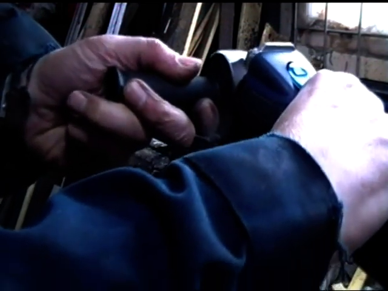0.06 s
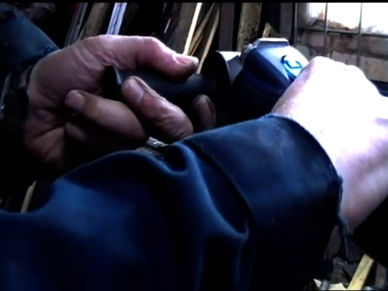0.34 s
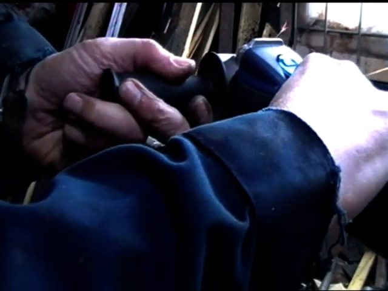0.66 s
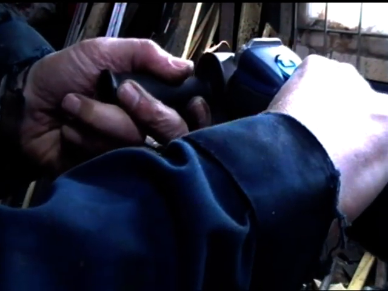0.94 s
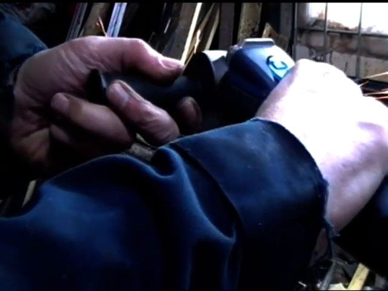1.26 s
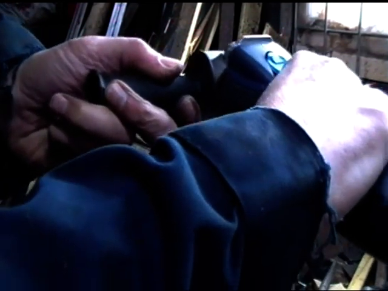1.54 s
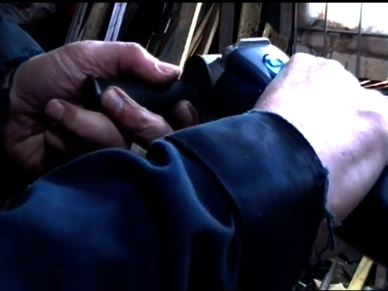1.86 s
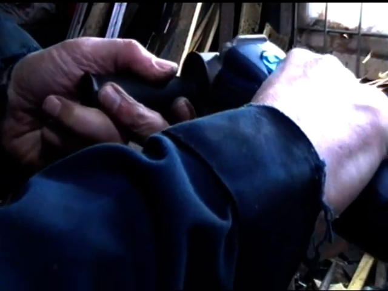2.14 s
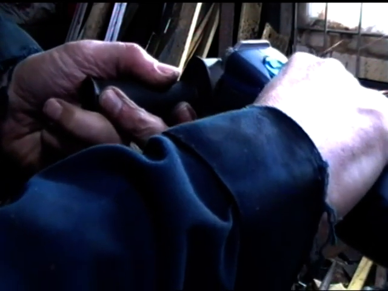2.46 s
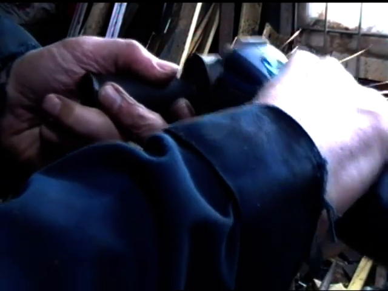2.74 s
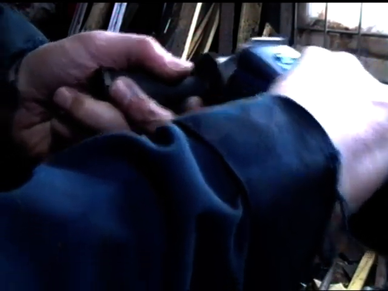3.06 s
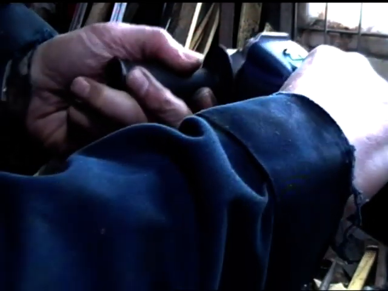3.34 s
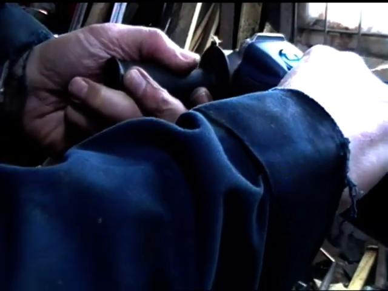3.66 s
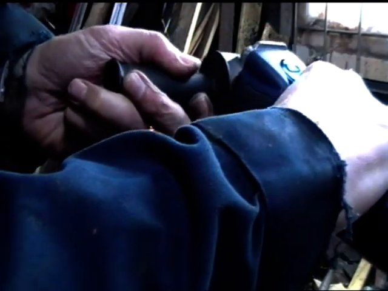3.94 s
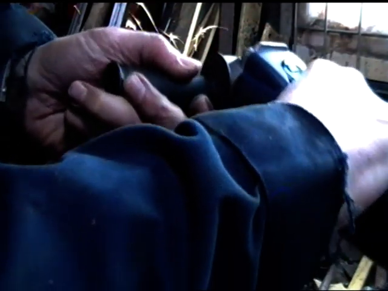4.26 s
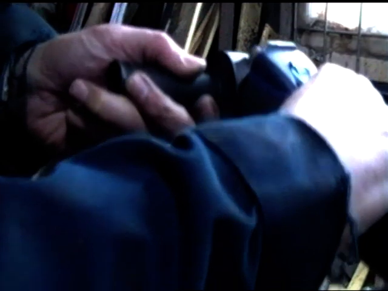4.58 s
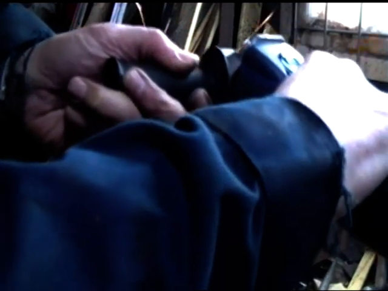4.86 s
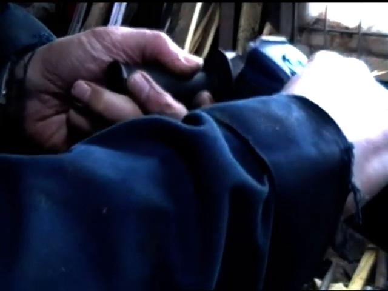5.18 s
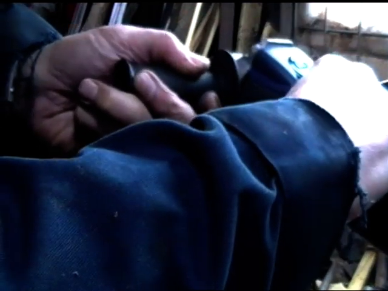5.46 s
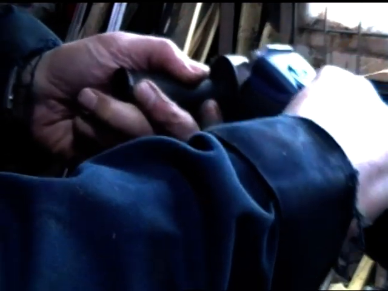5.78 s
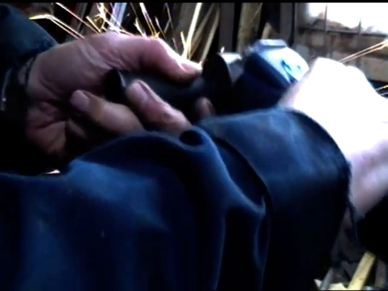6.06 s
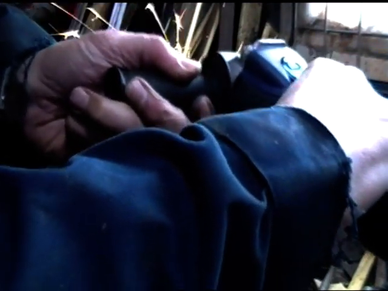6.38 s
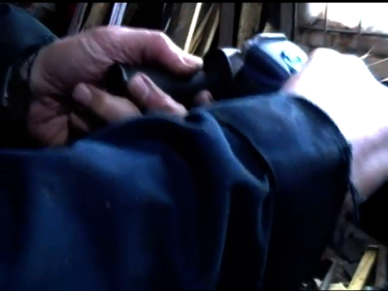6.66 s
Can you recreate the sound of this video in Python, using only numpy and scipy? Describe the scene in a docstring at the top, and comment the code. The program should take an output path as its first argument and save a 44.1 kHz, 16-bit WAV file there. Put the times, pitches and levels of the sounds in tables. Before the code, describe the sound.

Close, loud and harsh, an angle grinder's disc scrapes steel in a workshop. It grazes lightly at first, then bears down in a long cut, a shorter one and another long one. The whine dips slightly under each push and recovers as the pressure eases. Metallic ringing, shifting squeals and a few crisp ticks of grit ride on the hiss, and the tool is still running at the end.

```python
"""A close, harsh rasp over a motor's whine: an angle grinder cuts steel in a workshop.
The disc's grit scrapes the steel turn after turn; steel, guard and disc ring, and friction makes them sing.
Pressed in three times, the motor sags and picks up again. Its gears whine, its rotor hums
and its fan blows air through the vents."""
import sys
import numpy as np
from scipy import signal
from scipy.fft import rfft, irfft
from scipy.io import wavfile
from scipy.ndimage import map_coordinates

SR = 44100
rng = np.random.default_rng(int(sys.argv[2]) if len(sys.argv) > 2 else 0)


def file_out(sig):
    """Save sig as 16-bit WAV at sys.argv[1]."""
    # one column per channel
    cols = np.atleast_2d(sig).T
    # limit, then scale
    lim = np.clip(cols, -1, 1)
    pcm = np.round(lim * 32767).astype(np.int16)
    wavfile.write(sys.argv[1], SR, pcm)


N = 305172
T = np.arange(N) / SR
FREQS = np.fft.rfftfreq(N, 1 / SR)
PINION_TEETH, CROWN_TEETH = 12, 37


def grit(disc_turns, repeat_share, wear_turns, points=512):
    """The rim's grain pattern recurs every turn and wears away; breaking grains add fresh noise."""
    count = int(disc_turns.max()) + 3
    fresh = rng.standard_normal((2 * count, points))
    rim = signal.lfilter([1], [1, -np.exp(-1 / wear_turns)], fresh, axis=0)[count:]  # one row a turn
    rim = signal.resample_poly(rim.ravel(), 1, 2)
    passing = map_coordinates(rim, [(disc_turns + 1) * points / 2], order=3)
    return np.sqrt(repeat_share) * unit(passing) + np.sqrt(1 - repeat_share) * rng.standard_normal(N)


# Scrape spectrum: (frequency [Hz], relative level [dB])
SCRAPE_SPECTRUM = [(100, -29.5), (1000, -13.5), (2500, 7.5), (5000, -3.5), (5900, 4), (7000, 0),
                   (8200, -0.5), (9600, -8.5), (10800, -8), (11500, -10.5), (12200, -38)]
# Scrape stereo image: (frequency [Hz], left-right correlation [-1..1])
SCRAPE_CORRELATION = [(1000, 1), (3000, 0.71), (5000, 0.86), (5900, 0.3), (7000, 0.24), (8100, -0.4),
                      (8900, 0.46), (10600, -0.21), (12000, -0.077)]

def scrape(disc_turns, contact, load, skip_db):
    """Grains cut the steel: a bright hiss that buzzes at the disc's rate."""
    bite_db = -29 + .5 * contact + 2.1 * load - skip_db + .5 * wander(10)
    grains = [grit(disc_turns, repeat_share=.75, wear_turns=1.7) for _ in range(2)]
    return amp(bite_db) * stereo(grains, amp(per_bin(SCRAPE_SPECTRUM)), per_bin(SCRAPE_CORRELATION))


def sizzle(disc_turns, contact, load, skip_db):
    """The finest hiss of the cut, heard only while the grit bites."""
    level_db = -44.5 + 2.5 * load - 5.1 * skip_db
    grains = [grit(disc_turns, repeat_share=.75, wear_turns=3) for _ in range(2)]
    return contact * amp(level_db) * stereo(grains, band(10600, 540), correlation=.1)


def chips(per_s):
    """Coarse grains break off: sparse clicks of uneven size."""
    return unit(rng.standard_normal(N) * (rng.random(N) < per_s / SR))


# Steel and guard modes: (frequency [Hz], nominal width [Hz], relative level [dB])
STEEL_MODES = [(1053, 60, -12), (1474, 80, -10), (1868, 67, -6), (2268, 55, -5.5), (2525, 140, -3.5),
               (3040, 220, -7), (4172, 70, -7.5)]

def steel_ring(disc_turns, load, skip_db):
    """Grit and chips drive the resonances of steel and guard."""
    grains = [grit(disc_turns, repeat_share=.034, wear_turns=6.4) + .14 * chips(per_s=150)
              for _ in range(2)]
    power = sum((amp(db) * band(hz, .59 * width_hz)) ** 2 for hz, width_hz, db in STEEL_MODES)
    level_db = -31 + .7 * load - .32 * skip_db
    return amp(level_db) * stereo(grains, np.sqrt(power), correlation=.9)


# Disc modes: (multiple of main pitch, width [Hz], relative level [dB], change at load 1 [dB])
DISC_RESONANCES = [(.968, 250, -5, 0), (1.004, 200, -4.5, 0), (1, 50, -7.5, 0), (1.068, 200, -2.3, -2)]
# Main pitch of the disc: (time [s], frequency [Hz])
DISC_PITCH_HZ = [(0, 3360), (.9, 3418), (1.5, 3390), (2.0, 3377), (2.75, 3350), (3.15, 3334), (3.6, 3400),
                 (4.1, 3436), (4.9, 3420), (5.6, 3410), (6.3, 3420), (6.92, 3390)]

def disc_ring(load, skip_db):
    """The disc's resonances drift as the point of contact moves."""
    pitch_hz = per_sample(DISC_PITCH_HZ) + 14 * wander(5.1)
    modes = sum(amp(db + load_db * load) * resonate(stereo_noise(), multiple * pitch_hz, width_hz)
                for multiple, width_hz, db, load_db in DISC_RESONANCES)
    return amp(-27 - .15 * skip_db) * stereo(modes, 1, correlation=.87)


# Face rub: (time [s], level [dB])
RUB_DB = [(0, -46), (.35, -37.5), (.55, -43), (.75, -41), (.95, -40), (1.3, -35.5), (1.5, -39),
          (2.3, -36.5), (2.48, -42), (2.8, -38), (3.1, -45), (3.4, -34.5), (3.8, -39.5), (4.05, -46),
          (4.75, -35), (5.5, -47), (5.75, -45), (6.92, -41.5)]
# Edge grazes: (time [s], half-width [s], level [dB])
EDGE_GRAZES = [(.01, .05, -27.5), (.17, .06, -28), (.71, .06, -29), (1.15, .05, -31), (1.31, 0.087, -28.5),
               (1.5, .04, -26.5), (1.75, 0.077, -33), (2.09, .09, -30), (2.33, 0.037, -28),
               (2.75, 0.21, -32), (3.3, 0.037, -31), (3.5, 0.07, -32), (3.88, 0.065, -33), (4.3, 0.1, -37),
               (4.66, 0.054, -29), (6.08, 0.15, -32), (6.5, 0.11, -32)]

def rubbing():
    """The disc's face rubs low on the steel; its edge grazes with a brighter rasp."""
    face = amp(per_sample(RUB_DB)) * stereo(stereo_noise(), band(1500, 350), correlation=.99)
    edge = swells(EDGE_GRAZES) * stereo(stereo_noise(), band(4500, 1060), correlation=1)
    return face + edge


def friction_tone(start_s, end_s, cycles, ramp_s=.06, flutter_db=2.3, waver_rad=.65):
    """Friction builds up a narrow tone, holds it with a slight waver and lets go."""
    envelope = np.clip(np.minimum(T - start_s, end_s - T) / ramp_s, 0, 1)
    flutter = amp(flutter_db * wander(40))
    return envelope * flutter * np.cos(2 * np.pi * cycles + waver_rad * wander(24))


# Steel tones: (start [s], end [s], multiple of disc rate, level [dB])
STEEL_TONES = [(.5, .8, 13, -39), (1.2, 1.48, 14, -37), (1.28, 1.7, 13, -34.5), (1.7, 1.88, 13, -30),
               (1.86, 2.03, 13, -26), (2.06, 2.22, 13, -32.5), (1.9, 2.15, 16, -36), (2.08, 2.42, 45, -46),
               (2.1, 2.9, 10, -42), (2.12, 2.6, 16, -34), (2.15, 2.45, 56, -48), (2.2, 2.98, 33, -44),
               (2.27, 2.47, 13, -28), (2.42, 2.78, 55, -49), (2.47, 3.0, 13, -33.5), (2.58, 2.93, 16, -30),
               (2.95, 3.11, 16, -31.5), (3.55, 3.88, 13, -35), (3.68, 3.97, 16, -36.5),
               (3.85, 4.11, 13, -32), (4.15, 4.35, 12, -32.5), (4.25, 4.48, 16, -35), (4.25, 4.4, 15, -36),
               (4.66, 5.38, 13, -35.5), (5.08, 5.34, 16, -33), (5.25, 5.75, 25, -37.5),
               (5.36, 5.6, 13, -31), (5.38, 5.72, 17, -32), (5.4, 5.9, 44, -52), (5.5, 5.8, 33, -38),
               (5.7, 6.8, 12, -40), (5.72, 6.38, 14, -37.5), (5.85, 6.12, 33, -35), (5.87, 6.08, 17, -32),
               (5.9, 6.2, 15, -36.5), (6.1, 6.5, 54, -51), (6.12, 6.4, 33, -37.5), (6.15, 6.8, 17, -37.5),
               (6.35, 6.82, 14, -36.5), (6.4, 6.85, 13, -35), (6.42, 6.85, 58, -54), (6.44, 6.86, 33, -36)]
# Disc squeals: (start [s], end [s], frequency [Hz], level [dB])
DISC_SQUEALS = [(.76, 1.15, 3452, -35.5), (1.82, 1.99, 3400, -31), (2.62, 2.85, 3310, -35),
                (3.3, 3.56, 3390, -35), (3.52, 3.95, 3405, -35.5), (3.97, 4.18, 3450, -29.5),
                (4.78, 4.97, 3470, -28.5), (4.93, 5.15, 3440, -32.5), (5.3, 5.6, 3410, -35),
                (6.72, 7.05, 3455, -30), (6.8, 7.05, 3400, -27)]

def singing(disc_turns, skip_db):
    """The steel sings locked to the disc's rate, choked by skips; the disc squeals at its own pitches."""
    steel = sum(amp(db) * friction_tone(start_s, end_s, round(multiple) * disc_turns)
                for start_s, end_s, multiple, db in STEEL_TONES)
    disc = sum(amp(db) * friction_tone(start_s, end_s, hz * T) for start_s, end_s, hz, db in DISC_SQUEALS)
    return steel * amp(-.5 * skip_db) + disc


# Grain snaps: (time [s], level [dB])
GRAIN_SNAPS = [(.907, -23), (1.057, -21.5), (1.33, -22), (1.479, -22), (1.893, -19.5), (4.064, -22),
               (4.371, -23), (4.428, -22), (4.851, -17.5), (4.86, -21), (4.983, -22), (5.072, -22),
               (5.158, -21.5), (6.128, -22), (6.178, -19), (6.732, -20.5)]

def snaps(decay_s=.002):
    """The coarsest grains crack off with a short, bright tick."""
    envelope = sum(amp(db) * (T >= at_s) * np.exp(-abs(T - at_s) / decay_s) for at_s, db in GRAIN_SNAPS)
    return envelope * stereo(stereo_noise(), band(3200, 970), correlation=.98)


# Presses: (start [s], end [s], start load, midway load, end load); load 1 = a firm push
PRESS_LOADS = [(0.71, 3.06, 0.04, 0.81, 1.08), (3.51, 4.48, 0.39, 0.9, 1.19),
               (4.87, 6.81, 0.72, 1.06, 0.93)]

def pressing(ramp_s=.08):
    """Contact and load on the disc: each press sets in quickly, bears down and lets go."""
    contact, load = np.zeros((2, N))
    for start_s, end_s, *push in PRESS_LOADS:
        touch = np.clip(np.minimum(T - start_s, end_s - T) / ramp_s + .5, 0, 1)
        contact += touch
        load += touch * np.interp(T, [start_s, (start_s + end_s) / 2, end_s], push)
    return contact, load


# Disc skips: (time [s], half-width [s], loss of bite [dB])
DISC_SKIPS = [(0.603, 0.069, 2), (2.94, 0.022, 3), (3.153, 0.052, 9), (4.23, 0.07, 2.5), (5.22, 0.066, 0.5),
              (5.818, 0.042, 2), (6.125, 0.03, 1), (6.4, 0.095, 2), (6.89, 0.11, 3)]

def skipping():
    """Bite lost, in dB, as the disc skips on the work too briefly to change speed."""
    return sum(db * bell(at_s, half_width_s) for at_s, half_width_s, db in DISC_SKIPS)


# Roar spectrum: (frequency [Hz], relative level [dB])
ROAR_SPECTRUM = [(20, -39), (80, -22.5), (150, -22.5), (220, -16.5), (350, -18.5), (520, -8.5), (750, -7.5),
                 (1350, -1.1), (2800, 0.5), (4500, 2.5), (7000, -6), (7700, -16.5), (9500, -13.5),
                 (11000, -19.5), (13000, -37)]
# Roar stereo image: (frequency [Hz], left-right correlation [-1..1])
ROAR_CORRELATION = [(30, 0.8), (200, 0.99), (500, 0.89), (1200, 0.91), (3500, 1), (5500, 0.48),
                    (7000, 0.55), (11000, 0.25)]

def roar(contact, load, sag, response_s=.14):
    """Vent air and disc rub: a broad roar that swells as the released motor picks up."""
    surge = lag(sag * (1 - contact), response_s)
    level_db = -24.5 - 1.48 * lag(load, response_s) + 2 * surge + .5 * wander(13)
    return amp(level_db) * stereo(stereo_noise(), amp(per_bin(ROAR_SPECTRUM)), per_bin(ROAR_CORRELATION))


# Rotor hum: (time [s], level [dB])
HUM_DB = [(0, -45), (1.2, -48.5), (1.65, -43), (2.25, -48.5), (2.8, -42.5), (3.15, -50.5), (3.45, -41.5),
          (4.1, -46.5), (4.45, -42.3), (4.68, -45.5), (4.9, -41), (5.3, -49), (5.95, -41), (6.92, -44.5)]
# Gear whine: (time [s], level [dB])
WHINE_DB = [(0, -52), (.55, -48), (.9, -54), (1.2, -45.5), (2.3, -40), (2.7, -42), (3.2, -41), (3.8, -44),
            (4.12, -40), (4.4, -42.5), (4.65, -38), (5.05, -44), (5.35, -40), (5.9, -42), (6.92, -41.5)]

def motor(rotor_turns, mains_hz=50):
    """Rotor unbalance, gear mesh, disc wobble and mains hum."""
    rotor_rad = 2 * np.pi * rotor_turns
    unbalance = amp(per_sample(HUM_DB) + .5 * wander(10)) * np.sin(rotor_rad)
    backlash_rad = .6 * wander(14) + .3 * wander(110)  # the teeth meet unevenly
    mesh = amp(per_sample(WHINE_DB) + 2 * wander(25)) * np.sin(PINION_TEETH * rotor_rad + backlash_rad)
    wobble = amp(-64 + 2 * wander(8)) * np.sin(rotor_rad * PINION_TEETH / CROWN_TEETH)
    mains = amp(-64.5 + 1.4 * wander(12)) * np.sin(2 * np.pi * mains_hz * T)
    return np.sqrt(2) * (unbalance + mesh + wobble + mains)


# Housing thrums: (time [s], half-width [s], level [dB])
HOUSING_THRUMS = [(.17, 0.092, -60), (1.1, 0.092, -50), (3.45, 0.11, -59), (4.68, 0.054, -49)]

def thrum():
    """The housing thrums in the hands: brief, dull swells."""
    rumble = irfft(rfft(rng.standard_normal(N)) * band(204, 30), N)
    return swells(HOUSING_THRUMS) * unit(rumble)


def amp(db):
    """Decibels to gain."""
    return 10 ** (np.asarray(db) / 20)


def unit(x):
    """Scales to rms 1."""
    return x / np.sqrt(np.mean(np.abs(x) ** 2) + 1e-20)


def per_sample(table):
    """Interpolates a time table."""
    return np.interp(T, *np.transpose(table))


def per_bin(table):
    """Interpolates a frequency table on a log axis."""
    hz, value = np.transpose(table)
    return np.interp(np.log(FREQS + 1), np.log(hz + 1), value)


def band(hz, half_width_hz):
    """A spectral hump, one gain a bin."""
    return 1 / (1 + ((FREQS - hz) / half_width_hz) ** 2)


def bell(at_s, half_width_s):
    """Gaussian pulse of height 1."""
    return np.exp(-((T - at_s) / half_width_s) ** 2)


def swells(table):
    """Sum of bell-shaped swells, one gain a sample."""
    return sum(amp(db) * bell(at_s, half_width_s) for at_s, half_width_s, db in table)


def wander(rate_hz, points=4096):
    """Random drift of rms 1, up to about rate_hz."""
    hz = np.fft.rfftfreq(points, T[-1] / points)
    slow = irfft(rfft(rng.standard_normal(points)) / (1 + (hz / rate_hz) ** 2))
    return np.interp(T, np.linspace(0, T[-1], points), unit(slow))


def lag(x, tau_s):
    """One-pole smoothing."""
    pole = np.exp(-1 / (tau_s * SR))
    return signal.lfilter([1 - pole], [1, -pole], x)


def resonate(x, hz, width_hz):
    """A steep resonance that follows the curve hz, to rms 1."""
    carrier = np.exp(2j * np.pi * np.cumsum(hz) / SR)
    pole = np.exp(-np.pi * width_hz / SR)
    baseband = signal.lfilter([(1 - pole) ** 2], [1, -2 * pole, pole * pole], x / carrier)
    return unit((carrier * baseband).real)


def stereo_noise():
    """Two unrelated white noises."""
    return rng.standard_normal((2, N))


def stereo(two, gain, correlation):
    """Filters two unrelated signals and mixes them to a correlated left and right of rms 1."""
    mid, side = rfft(two) * gain
    mid *= np.sqrt((1 + correlation) / 2)
    side *= np.sqrt((1 - correlation) / 2)
    return unit(irfft([mid + side, mid - side], N))


def scene(free_hz=614, sag_hz=40, inertia_s=.57):
    """Pressing slows the motor and deepens the bite; the bevel-geared disc chatters on the work."""
    contact, load = pressing()
    skip_db = skipping()
    sag = lag(load, inertia_s)
    rotor_turns = np.cumsum(free_hz - sag_hz * sag) / SR
    contact_shift_turns = .0014 * wander(36)
    disc_turns = rotor_turns * PINION_TEETH / CROWN_TEETH + contact_shift_turns
    chatter_db = wander(100)
    cutting = scrape(disc_turns, contact, load, skip_db) + sizzle(disc_turns, contact, load, skip_db)
    ringing = steel_ring(disc_turns, load, skip_db) + disc_ring(load, skip_db)
    grinding = amp(chatter_db) * (cutting + ringing + rubbing())
    machine = roar(contact, load, sag) + motor(rotor_turns) + thrum()
    return grinding + singing(disc_turns, skip_db) + snaps() + machine


def record(dry, target_db=-21, response_s=.083, share=.3, cutoff_hz=11900):
    """Gain control removes a share of each swing about target_db; slight lean right, then a low-pass."""
    excess_power = (dry ** 2).mean(0) / amp(target_db) ** 2 - 1
    held = dry * (1 + lag(excess_power, response_s)) ** (-share / 2)
    balance = amp([[-.2], [.2]])
    lowpass = signal.firwin(301, cutoff_hz, window=("kaiser", 9), fs=SR)
    return signal.oaconvolve(held * balance, lowpass[None], "same")


dry = scene()
out = record(dry)
file_out(out)
```